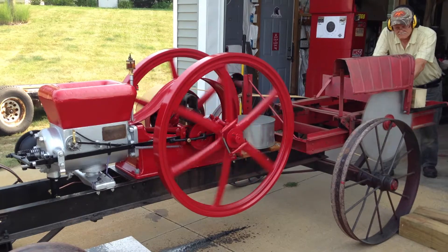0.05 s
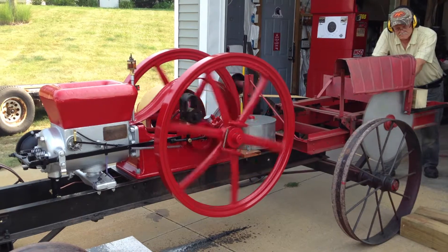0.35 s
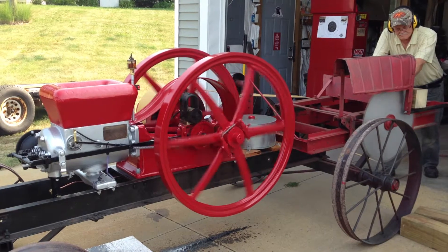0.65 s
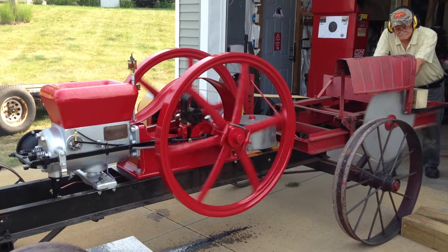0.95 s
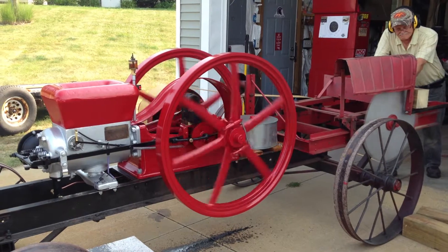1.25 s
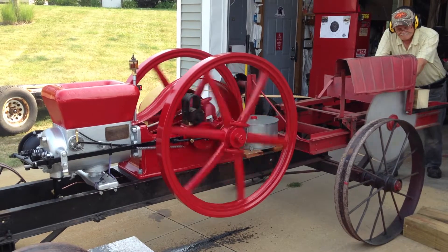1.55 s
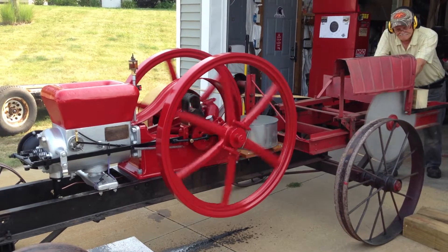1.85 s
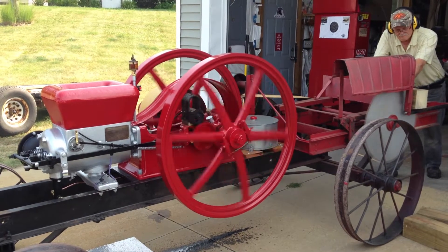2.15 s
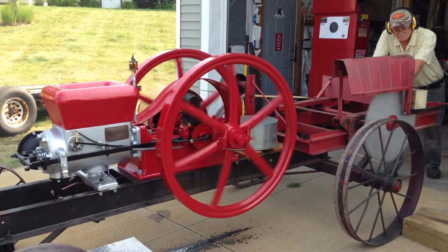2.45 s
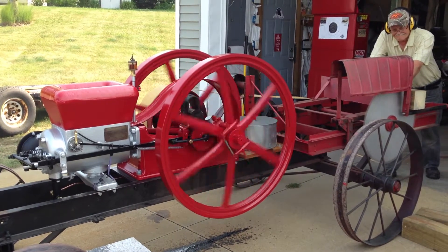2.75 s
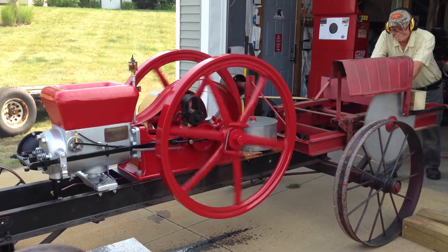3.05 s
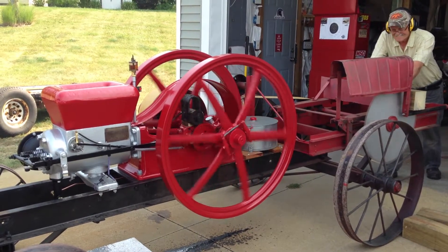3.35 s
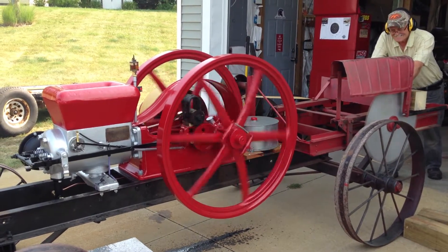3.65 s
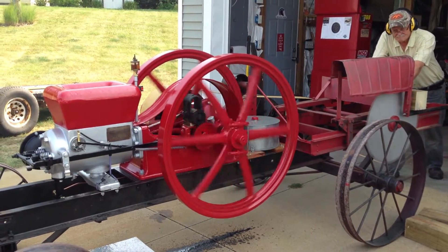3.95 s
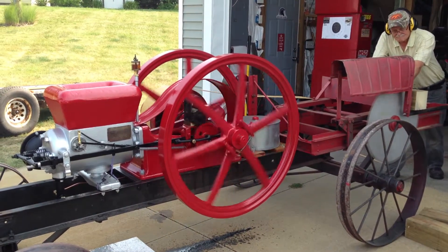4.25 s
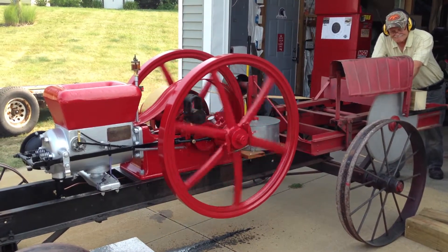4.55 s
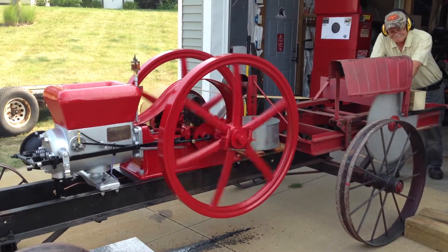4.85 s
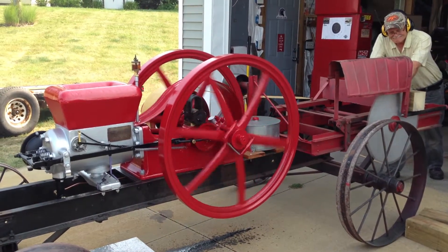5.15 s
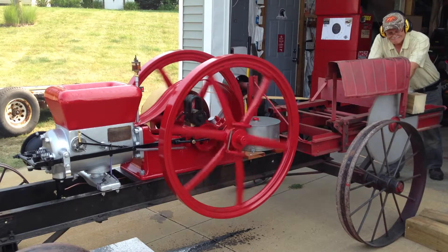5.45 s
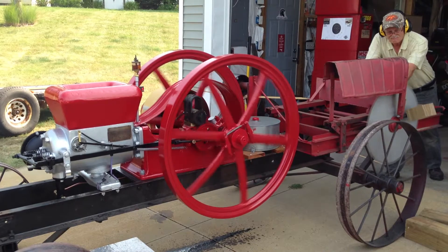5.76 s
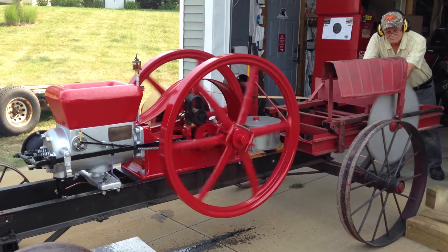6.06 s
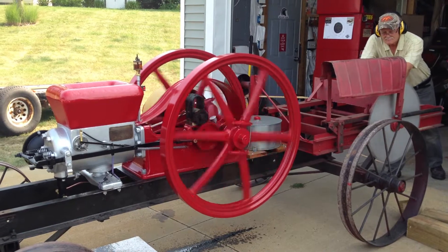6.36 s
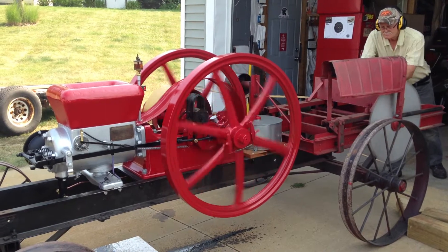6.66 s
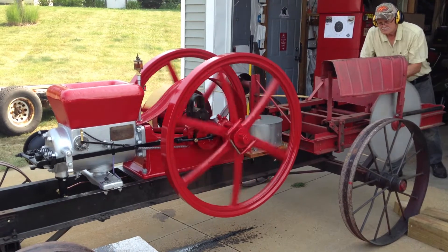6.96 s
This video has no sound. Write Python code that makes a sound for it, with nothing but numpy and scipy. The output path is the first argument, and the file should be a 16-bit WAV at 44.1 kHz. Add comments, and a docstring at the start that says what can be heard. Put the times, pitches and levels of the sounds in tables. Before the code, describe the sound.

A circular saw rasps and squeals through wood over an old engine's uneven barks, until the cut ends and the engine clatters on.

```python
"""Outside an open garage, an old hit-and-miss engine rumbles and drives a buzz saw through a log.
From the start the teeth ring the steel blade and the wood and spray dust; fibres snap, the blade squeals.
Each firing barks from the exhaust with a rising whistle, and a limiter ducks everything for a moment.
Around two seconds the kerf deepens and the blade whines. After five seconds the cut is through;
the engine fires once more and coasts on, its valve gear clanking and its piston puffing air."""
import sys
import numpy as np
from scipy import signal
from scipy.fft import rfft, irfft, next_fast_len
from scipy.io import wavfile
from scipy.ndimage import uniform_filter1d, minimum_filter1d

SR = 44100
rng = np.random.default_rng(int(sys.argv[2]) if len(sys.argv) > 2 else 0)


def master(y):
    """Save y as 16-bit WAV."""
    cut = np.clip(np.atleast_2d(y).T, -1, 1)
    pcm = np.round(cut * 32767)  # scale
    wavfile.write(sys.argv[1], SR, pcm.astype(np.int16))


N = 312669
TIME = np.arange(N) / SR


def amp(db):
    """Decibels to gain."""
    return 10 ** (np.asarray(db) / 20)


def unit(x):
    """Scales to rms 1."""
    return x / np.sqrt(np.mean(x ** 2) + 1e-20)


def add(mix, s, sound):
    """Mixes a sound in at time s."""
    part = mix[max(round(s * SR), 0):][:len(sound)]
    part += sound[:len(part)]


def wander(hz, step=32):
    """Smooth random modulation of rms 1, moving at rates up to hz."""
    count = next_fast_len(N // step + 2)
    f = np.fft.rfftfreq(count, step / SR)
    coarse = irfft(rfft(rng.standard_normal(count)) / (1 + (f / hz) ** 4), count)
    return np.interp(np.arange(N) / step, np.arange(count), unit(coarse))


def shiver(count, smooth):
    """Fast random modulation of rms 1: noise averaged over `smooth` samples."""
    return unit(uniform_filter1d(rng.standard_normal(count), smooth))


def swell(s, width):
    """A bell-shaped envelope around time s."""
    return np.exp(-.5 * np.minimum(((TIME - s) / width) ** 2, 200))


def body(x, spectrum, modes=(), tilt_db=0, size=8192):
    """Rings x through a body: a broad EQ curve, tilted per octave, with resonances standing on it."""
    hz = np.fft.rfftfreq(size, 1 / SR) + 1
    f, db = np.transpose(spectrum)
    octaves = np.log2(np.maximum(hz, 200) / 1000)
    broad = amp(np.interp(np.log(hz), np.log(f), db) + tilt_db * octaves)
    peaks = 1 + sum(amp(boost) ** 2 / (1 + (2 * (hz - centre) / width) ** 2)
                    for centre, width, boost in modes)
    cepstrum = irfft(np.log(broad * np.sqrt(peaks)))
    cepstrum[1:size // 2] *= 2  # minimum phase: the ring follows the hit
    cepstrum[size // 2 + 1:] = 0
    ring = irfft(np.exp(rfft(cepstrum)))
    return signal.oaconvolve(x, ring / np.linalg.norm(ring))[:len(x)]


def scatter(x, t60, share):
    """Nearby steel parts return the sound within milliseconds and comb its spectrum."""
    t = np.arange(SR // 8) / SR
    taps = rng.standard_normal(len(t)) * amp(-60 * t / t60)
    taps *= np.sqrt(share) / np.linalg.norm(taps)
    taps[0] = np.sqrt(1 - share)
    return signal.oaconvolve(x, taps)[:len(x)]


# Fader moves as the log is fed in until it parts: (time [s], blade [dB], log [dB], dust [dB])
FEED = [(0.0, -13.5, -24.5, -34.5), (0.4, -15, -24.5, -35.5), (0.8, -14.5, -24.5, -35),
        (1.9, -14, -20.5, -31.5), (2.1, -13, -25.0, -29), (2.2, -15.5, -24.0, -35.5),
        (2.6, -13, -22, -32.5), (3.0, -18, -24, -37), (3.3, -17, -25, -32.5), (3.4, -20, -25, -37.0),
        (3.6, -18, -26, -35), (4.2, -19.5, -26.5, -35.5), (4.6, -13, -24.5, -28.5), (4.7, -18, -24.5, -36),
        (5.3, -18.0, -26.0, -34.5), (5.4, -21.5, -34, -38), (5.5, -34.5, -44, -60),
        (5.7, -41.5, -44.5, -57)]
# The teeth dig in or run slack: (peak time [s], level change [dB], half width [s])
BITES = [(.16, -3, 0.016), (.26, -1.5, 0.023), (2.11, -1.5, 0.016), (2.19, 0.5, 0.023), (2.26, 0.5, 0.021),
         (2.68, -0.5, .035), (2.97, -1, .03), (2.44, -4, .03), (2.81, 1, 0.025), (3.19, 0, .035),
         (3.72, 0, 0.046), (4.07, 4.5, 0.048), (4.539, -7, 0.032), (4.584, 3, 0.014), (5.02, -3.5, 0.047),
         (5.43, 5, 0.022)]


def cutting_force(fade_db_per_s=76, grain_db=0.96, surge_db=3.5, surge_lead_s=0.039):
    """Gains of blade, log and dust: the feed, made uneven by the grain and jerked by power strokes."""
    times, *faders = np.transpose(FEED)
    push_db = grain_db * wander(22.3) - fade_db_per_s * np.maximum(TIME - times[-1], 0)
    push_db += sum(db * swell(s, width) for s, db, width in BITES)
    # each power stroke jerks the belt just before the exhaust opens
    push_db += surge_db * sum(swell(s - surge_lead_s, width=0.015) for s, *_ in FIRINGS)
    blade, log, dust = (amp(np.interp(TIME, times, db) + push_db) for db in faders)
    return blade, log * amp(1.17 * wander(24)), dust


def teeth(teeth_per_s=360, slip=0.12, spread_db=0.5, tear_decay=0.68, grit=0.88, chatter_db=0.66):
    """Each tooth strikes with its own force, then tears fibres until the next one bites."""
    passed = np.cumsum(teeth_per_s * np.exp(slip * wander(120))) / SR
    tooth = passed.astype(int)
    force = amp(spread_db * np.clip(rng.standard_normal(N), -2, 2))[tooth]
    strikes = np.diff(tooth, prepend=0) * force
    tearing = rng.standard_normal(N) * force * (.5 + np.exp(-(passed % 1) / tear_decay))
    rasp = np.sqrt(1 - grit) * unit(strikes) + np.sqrt(grit) * unit(tearing)
    return unit(rasp * amp(chatter_db * wander(47.5)))


# The blade's bright tone colour: (frequency [Hz], level [dB])
BLADE_EQ = [(300, -76), (1200, -69), (2000, -32.5), (2400, -12.5), (3200, -8.5), (4300, 3.5), (5500, -10),
            (6500, -10.5), (7150, -11), (8000, -7), (11000, -59)]
# Its steely resonances: (frequency [Hz], width [Hz], boost [dB])
BLADE_MODES = [(2252, 16, 29), (2436, 45, 24), (2630, 26, 19), (2772, 72, 25), (2863, 13, 0),
               (3040, 3.9, -10), (3114, 21, 26), (3220, 60, 4), (3327, 29, 24.5), (3410, 150, 16.5),
               (3710, 77, 22), (3809, 35, 23.5), (4115, 147, 18), (4454, 61, 22), (4635, 39, 20),
               (4740, 31, 16), (4991, 90, 19.5), (5387, 100, 25), (4970, 100, 21), (5600, 15, 31.5),
               (5770, 77, 16), (5780, 24, 9.5), (5830, 69, 20.5), (6095, 77, 21), (6200, 48, 9.5),
               (6710, 39, 18), (6560, 32, 12), (6860, 18, -7), (6440, 17, 3), (7150, 17, 25)]


def blade_ring(rasp):
    """The rasp of the teeth rings the steel disc."""
    return body(rasp, BLADE_EQ, BLADE_MODES)


def sing(hz, drift_hz, swell_db):
    """One lightly damped mode, wavering in pitch and strength."""
    tone = np.sin(2 * np.pi * np.cumsum(hz + drift_hz * wander(29.6)) / SR)
    return unit(tone * amp(swell_db * wander(32)))


# The blade's singing partials: (frequency [Hz], level [dB])
BLADE_PARTIALS = [(1207, -24), (1645, -22.5), (1921, -37), (3011, -20), (3092, -40), (3429, -30),
                  (3601, -24), (3790, -13), (4085, -14), (4568, -14), (4694, -28), (4890, -20), (5447, -47)]


def blade_song():
    """The teeth keep the blade's least damped modes singing."""
    return sum(amp(db) * sing(hz, drift_hz=13.07, swell_db=5) for hz, db in BLADE_PARTIALS)


# The log's tone colour with a shallow and a deep kerf: (frequency [Hz], level [dB])
SHALLOW_EQ = [(40, -77), (100, -52), (250, -15.5), (400, -19.5), (900, -1), (1500, 9), (2200, -4),
              (3000, 9), (5000, -24)]
DEEP_EQ = [(40, -62), (100, -26), (250, -12.5), (400, -9.5), (900, 0.5), (1500, 1), (2000, -8),
           (2600, -8.5), (5000, -9)]
# Its woody resonances at both depths: (frequency [Hz], width [Hz], boost [dB])
SHALLOW_MODES = [(270, 3.3, 19), (330, 7.8, 14), (584, 53, 5.5), (773, 12, 20.5), (1007, 23, 11.7),
                 (1214, 32, 10.1), (1598, 15, 15.2), (1590, 30, 4), (1692, 27, 13.4), (1872, 18, 15.6),
                 (1930, 7.6, 25.2), (2060, 45, 14.2), (2179, 32, 23.3), (2170, 6, 5.7)]
DEEP_MODES = [(280, 2.4, 31.4), (364, 11, 26.8), (457, 74, 14.8), (620, 38, 15.4), (792, 25, 22),
              (1005, 28, 18.5), (1170, 85, 15.4), (1421, 86, 19.4), (1564, 29, 22.3), (1700, 63, 22.5),
              (1883, 41, 25.5), (2000, 14, 11.2), (1980, 16, 7.4), (2120, 120, 19.2)]


def log_ring(rasp, force, depth):
    """The teeth ring the log, whose resonances crossfade as the kerf deepens."""
    shallow = body(rasp * force * np.sqrt(1 - depth), SHALLOW_EQ, SHALLOW_MODES)
    late_rasp = np.roll(rasp, SR // 100)  # decorrelates the two layers
    return shallow + body(late_rasp * force * np.sqrt(depth), DEEP_EQ, DEEP_MODES)


# The airy hiss of sawdust: (frequency [Hz], level [dB])
DUST_EQ = [(300, -63), (3000, -62), (6000, 3), (8000, 3.5), (9500, -0.5), (11500, -4.5), (13000, -10.5),
           (15500, -20)]


def sawdust(rasp):
    """The teeth throw a hissing spray of dust."""
    return scatter(body(rasp, DUST_EQ), t60=0.17, share=0.4)


# The drone's fader moves: (time [s], level [dB])
DRONE_LEVELS = [(0, -48.5), (1.5, -42.5), (2.35, -47), (3.0, -39), (3.85, -49), (4.35, -35.5), (4.7, -39),
                (5.15, -36), (5.5, -70)]
# Its dark tone colour: (frequency [Hz], level [dB])
DRONE_EQ = [(60, -53), (100, -22), (135, 0), (260, -5), (650, -1), (1200, -24)]
# Its low resonances: (frequency [Hz], width [Hz], boost [dB])
DRONE_MODES = [(277.7, 2.3, 40), (340.7, 11, 27), (485, 43, 17.5), (613, 29, 17)]


def log_drone(uneven_db=1.9):
    """The log drones unevenly on its table."""
    level = amp(np.interp(TIME, *np.transpose(DRONE_LEVELS)) + uneven_db * wander(23))
    return level * body(rng.standard_normal(N), DRONE_EQ, DRONE_MODES)


# Rough time marks that, with the firings, pace the frame's uneven low shudder: (time [s])
SHUDDER_MARKS = [0.8, 0.8, 3, 5, 3, 10, 8]
# The frame's low-end weight: (frequency [Hz], level [dB])
RUMBLE_EQ = [(20, -36), (55, -32), (90, -38), (130, -4), (190, 6.5), (300, -1), (500, 1), (900, -9),
             (2000, -67)]


def frame_rumble(level_db=-50, shudder_db=6.5, peak_phase=0.56, width_cycles=0.094, uneven_db=3):
    """The engine's frame rumbles, shuddering twice between one firing or time mark and the next."""
    marks = np.sort([s for s, *_ in FIRINGS] + SHUDDER_MARKS)
    cycles = 2 * np.interp(TIME, marks, np.arange(len(marks)))
    from_peak = (cycles - peak_phase + .5) % 1 - .5
    shudder = np.exp(-.5 * (from_peak / width_cycles) ** 2)
    shake = amp(level_db + shudder_db * shudder + uneven_db * wander(20))
    return body(rng.standard_normal(N) * shake, RUMBLE_EQ)


# The whirr's fader moves: (time [s], level [dB])
WHIRR_LEVELS = [(0, -37), (5.5, -49), (5.75, -43.5), (6.25, -39.5), (6.53, -49), (6.72, -44.5), (6.85, -44),
                (7.09, -44)]
# Its mid-heavy tone colour: (frequency [Hz], level [dB])
WHIRR_EQ = [(18, -80), (30, -46), (59, -91), (174, -25), (215, -10), (702, -7), (844, 0.5), (937, -3.5),
            (1320, -9), (5170, -13), (6380, -19), (6900, -20.5), (13300, -28.5), (14800, -37), (16000, -54)]


def gear_whirr(flutter_db=2):
    """Gears and belt lay down a fluttering bed of noise."""
    level = amp(np.interp(TIME, *np.transpose(WHIRR_LEVELS)) + flutter_db * wander(56))
    return body(rng.standard_normal(N) * level, WHIRR_EQ)


# Woody knocks: (time [s], level [dB], tilt [dB/octave])
KNOCKS = [(.058, -32, -24), (.143, -34, 1), (.552, -33, -2), (1.246, -23, -0.5), (1.435, -20.5, -2),
          (1.578, -28, -7), (2.732, -24, 10), (3.307, -34, 0), (4.13, -20, -7.5), (4.83, -23, -7)]


def fibre_knocks(t60=0.06):
    """Hard fibres snap, each with a burst that rings the log."""
    out, t = np.zeros(N), np.arange(SR // 5) / SR
    for s, db, tilt_db in KNOCKS:
        snap = rng.standard_normal(len(t)) * amp(db - 60 * t / t60)
        add(out, s, body(snap, DEEP_EQ, tilt_db=tilt_db))
    return out


# Short squeals: (peak time [s], pitch [Hz], half width [s], level [dB])
SQUEALS = [(.12, 3820, 0.039, -29), (.68, 3690, 0.037, -19.5), (.73, 3200, 0.031, -26),
           (.82, 1921, 0.018, -24), (1.09, 4565, 0.023, -18), (1.12, 3792, 0.07, -20),
           (1.66, 1927, 0.034, -25.5), (1.78, 1905, .03, -21), (1.942, 1900, 0.012, -18),
           (2.055, 3820, 0.018, -13), (2.29, 3790, 0.05, -20.5), (2.34, 1599, 0.04, -22.5),
           (2.82, 1205, 0.085, -24), (2.8, 1616, .04, -22), (3.31, 1634, 0.048, -27.5),
           (3.52, 3800, 0.014, -25), (4.1, 3780, 0.036, -28), (4.49, 4330, 0.021, -27),
           (4.86, 3784, .04, -25)]


def blade_squeals(drift_hz=8):
    """The blade catches in uneven grain and one mode flares up for a moment."""
    bend = np.cumsum(drift_hz * wander(45)) / SR
    return sum(amp(db) * swell(s, width) * np.sqrt(2) * np.sin(2 * np.pi * (hz * TIME + bend))
               for s, hz, width, db in SQUEALS)


def rough_tone(hz, rough):
    """A tone blown by turbulent gas: its pitch and strength shiver."""
    pitch = hz * (1 + rough * shiver(len(hz), smooth=40))
    strength = 1 + 0.28 * shiver(len(hz), smooth=40)
    return np.sqrt(2) * np.sin(2 * np.pi * np.cumsum(pitch) / SR) * strength


# Exhaust barks, each with its own mix of layers:
# (time [s], overall level [dB], blow length [s], thump [dB], whistle [dB], howl [dB])
FIRINGS = [(.339, -10.5, 0.014, -12.5, -10, -7.5), (.875, -13, .015, -12, -2, -7),
           (1.961, -4, 0.02, -18, -15, -10.5), (2.51, -6, 0.018, -22, -0.5, -2.5),
           (3.043, -4.5, 0.014, -23, -6, -11), (3.566, -8, 0.0175, -17, -0.5, -6.5),
           (5.190, -3, 0.018, -16, -14, -15.5), (6.229, -7.5, 0.023, -9.5, -8, -8.5)]
# Tone colours of the gas jet and the pressure thump: (frequency [Hz], level [dB])
JET_EQ = [(30, -67), (80, -59), (150, -13), (330, -2), (550, -1.5), (900, 5), (1500, 0), (2500, 4),
          (4000, -1), (6000, 7), (8000, 1.5), (11000, -1), (15500, -7)]
THUMP_EQ = [(25, -15), (70, -9), (130, 0), (350, 2.5), (900, 9), (3000, -50)]


def exhaust(open_s=0.0019, close_s=0.013, thump_hz=350, start_hz=1650, top_hz=2620, glide_s=0.00577):
    """The valve cracks open: a pressure thump, a jet of gas, a rising whistle and a howl in the pipe."""
    out, t = np.zeros(N), np.arange(SR // 5) / SR
    cycles = thump_hz * t  # the pipe's lowest mode dies in a few cycles
    thump = body(-np.sin(2 * np.pi * cycles) * np.exp(-cycles / 2), THUMP_EQ)
    thump *= amp(5) / abs(thump).max()
    late = np.maximum(t - 0.0034, 0)  # the whistle speaks just after the jet
    whistle_shape = (1 - np.exp(-late / 0.0005)) * np.exp(-(late / .021) ** 4)
    whistle_hz = top_hz - (top_hz - start_hz) * np.exp(-late / glide_s)
    howl_shape = np.exp(-((t - .021) / 0.013) ** 2)
    howl_hz = 704 + 357.28 * np.exp(-t / 0.02174)  # sinks as the gas in the pipe cools
    for s, db, length, thump_db, whistle_db, howl_db in FIRINGS:
        flow = (1 - np.exp(-t / open_s)) * np.exp(-np.maximum(t - length, 0) / close_s)
        jet = body(rng.standard_normal(len(t)) * flow, JET_EQ)
        whistle = amp(whistle_db) * whistle_shape * rough_tone(whistle_hz, rough=0.065)
        howl = amp(howl_db) * howl_shape * rough_tone(howl_hz, rough=0.231)
        add(out, s, amp(db) * (jet + amp(thump_db) * thump + whistle + howl))
    return out


def blade_whine(binding, hz=1571, sway_hz=21):
    """The blade binds in the deep kerf and whines at an unsteady pitch."""
    return binding * sing(hz + sway_hz * wander(6), drift_hz=11, swell_db=3.5)


# Soft swishes: (peak time [s], level [dB], half width [s])
SWISHES = [(5.575, -36.5, 0.019), (5.951, -30.5, 0.018), (6.185, -37.5, 0.032), (6.603, -35.5, 0.019),
           (7.09, -34, 0.011)]
# Their tone colour: (frequency [Hz], level [dB])
RUB_EQ = [(200, -23), (800, -11), (2000, 1.5), (3200, -4.5), (4800, 1), (7000, -2.5), (10000, -9),
          (15500, -15)]


def rubbing_swishes():
    """A few soft rubbing swishes as the engine coasts."""
    contact = sum(amp(db) * swell(s, width) for s, db, width in SWISHES)
    return body(rng.standard_normal(N) * contact, RUB_EQ)


# Hits of valve gear, igniter trip (6.135 s) and governor latch, and a combustion thump (6.193 s) just before
# the last firing: (time [s], level [dB], tilt [dB/octave], decay t60 [s])
CLANKS = [(5.706, -21.5, -1, 0.075), (5.715, -27, -3.5, 0.083), (5.827, -26.5, 0.5, 0.14),
          (5.984, -29.5, 4.5, 0.076), (6.004, -28.5, -2, 0.16), (6.03, -27.5, 4.5, 0.057),
          (6.135, -23.5, 9.5, 0.062), (6.159, -28, 0, 0.054), (6.193, -27, -14, 0.068),
          (6.22, -24.5, -1.5, 0.37), (6.342, -30, 5, 0.21), (6.664, -38, 2, 0.071), (6.733, -29.5, 4, 0.11),
          (6.739, -24, -3, 0.1), (6.775, -30, -6.5, 0.088), (6.805, -31.5, -2.5, 0.12),
          (6.844, -24.5, 8.5, 0.065), (6.850, -22, 4.5, 0.08), (6.869, -25.5, -1.5, 0.074)]
# The cast frame's tone colour: (frequency [Hz], level [dB])
IRON_EQ = [(40, -54), (130, -25), (300, -6), (700, -2.5), (1000, -2), (2000, 0), (3000, -2.5), (5500, 0),
           (8000, -12.5), (12000, -19.5), (16000, -33)]
# Its resonances: (frequency [Hz], width [Hz], boost [dB])
IRON_MODES = [(782, 31, 12), (1076, 62, 10.5), (1870, 180, 11), (3200, 54, -5), (3870, 43, 7.5)]


def valve_gear(rattle_db=3, trim_db=2, attack_s=0.00084):
    """Loose iron parts knock: each blow is a dying cluster of tiny contacts that rings the frame."""
    out, t = np.zeros(N), np.arange(SR // 4) / SR
    for s, db, tilt_db, t60 in CLANKS:
        contacts = unit(rng.standard_normal(len(t)) * amp(rattle_db * shiver(len(t), smooth=60)))
        blow = contacts * (1 - np.exp(-t / attack_s)) * amp(-60 * t / t60)
        add(out, s, amp(db + trim_db) * body(blow, IRON_EQ, IRON_MODES, tilt_db))
    return scatter(out, t60=0.019, share=0.45)


def resonate(x, hz, width_hz):
    """A resonance that sweeps along the curve hz."""
    carrier = np.exp(2j * np.pi * np.cumsum(hz) / SR)
    pole = np.exp(-np.pi * width_hz / SR)
    once = signal.lfilter([1 - pole], [1, -pole], x / carrier)
    return (carrier * signal.lfilter([1 - pole], [1, -pole], once)).real


# Breathy puffs through the open valve: (time [s], length [s], starting pitch [Hz], level [dB])
PUFFS = [(5.706, 0.224, 1100, -38), (6.043, .1, 940, -40), (6.732, 0.15, 1150, -39.5)]


def piston_puffs(low_hz=270, fall_s=0.073, attack_s=0.01, release_s=0.023, fade_db_per_s=26):
    """The coasting piston pumps air through the hollow cylinder; the note sinks as it draws back."""
    out, t = np.zeros(N), np.arange(SR // 3) / SR
    for s, length, start_hz, db in PUFFS:
        hz = low_hz + (start_hz - low_hz) * np.exp(-(t / fall_s) ** 1.6)
        breath = resonate(rng.standard_normal(len(t)), hz, width_hz=260)
        flutter = amp(4 * wander(70)[:len(t)])
        flow = np.minimum(t / attack_s, 1) * np.exp(-np.maximum(t - length, 0) / release_s)
        add(out, s, unit(breath * flutter) * flow * amp(db - fade_db_per_s * t))
    return signal.lfilter(*signal.butter(3, 120, "high", fs=SR), out)


# The tone colour that the walls return: (frequency [Hz], level [dB])
WALL_EQ = [(60, -42), (200, -3), (600, 8.5), (1000, 1), (2500, 5), (6000, -3), (10000, 0.5), (16000, -5.5)]


def garage(x, t60=0.18, echoes_per_s=2500, predelay_s=0.004):
    """Sparse reflections from the floor, the wall and the open garage."""
    t = np.arange(SR // 2) / SR
    signs = rng.choice([-1., 1.], len(t))
    arrivals = (rng.random(len(t)) < echoes_per_s / SR) & (t > predelay_s)
    taps = body(signs * arrivals * amp(-60 * t / t60), WALL_EQ)
    return signal.oaconvolve(x, taps / np.linalg.norm(taps))[:N]


def saw():
    """The whole cut: one set of teeth excites blade, log and dust."""
    blade, log, dust = cutting_force()
    rasp = teeth()
    depth = np.interp(TIME, [1.5, 2.4], [0, 1])  # the kerf goes from shallow to deep
    steel = amp(-.5) * blade_ring(rasp * blade) + amp(1.5) * blade * blade_song()
    wood = amp(-.5) * log_ring(rasp, log, depth)
    spray = amp(4.5) * sawdust(rasp * dust)
    strain = amp(-6.5) * blade_whine(log * depth) + log_drone()
    return steel + wood + spray + strain + blade_squeals() + fibre_knocks()


def scene():
    """Mono mix of engine, saw and running gear, with engine and saw sent to the garage."""
    engine = exhaust() + valve_gear() + piston_puffs()
    cutting = saw()
    running = frame_rumble() + scatter(gear_whirr() + rubbing_swishes(), t60=0.094, share=0.15)
    reflections = garage(amp(-13) * engine + amp(-10.5) * cutting)
    return (cutting + engine + running + reflections)[None]


def limiter(x, threshold_db=-11.5, sense_s=0.0075, hold_s=0.12, recover_db_per_s=58):
    """The gain drops at once when the sound passes the threshold, holds, and climbs back."""
    sense, hold = round(sense_s * SR), round(hold_s * SR)
    power_db = 10 * np.log10(abs(uniform_filter1d((x ** 2).mean(0), sense)) + 1e-12)
    gain_db = np.minimum(threshold_db - power_db, 0)
    held_cut_db = -minimum_filter1d(gain_db, hold, origin=(hold - 1) // 2, mode="nearest")
    recovery_db = recover_db_per_s * TIME
    cut_db = np.maximum.accumulate(held_cut_db + recovery_db) - recovery_db
    return x * amp(-uniform_filter1d(cut_db, sense))


def record(dry, ceiling=0.74, low_cut_hz=85, high_cut_hz=15650):
    """Master chain: ducks after loud barks, rounds off the peaks, thins the bass and trims the top."""
    ducked = limiter(dry)
    rounded = ducked / (1 + (ducked / ceiling) ** 8) ** (1 / 8)
    thinned = signal.lfilter(*signal.butter(1, low_cut_hz, "high", fs=SR), rounded)
    high_cut = signal.firwin(511, high_cut_hz, window=("kaiser", 9), fs=SR)
    return signal.oaconvolve(thinned, high_cut[None], "same")


dry = scene()
out = record(dry)
master(out)
```